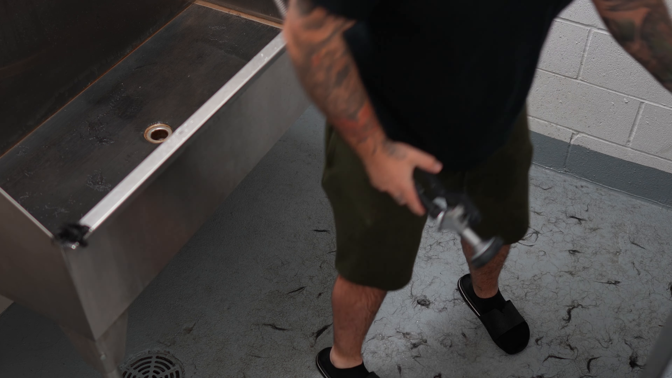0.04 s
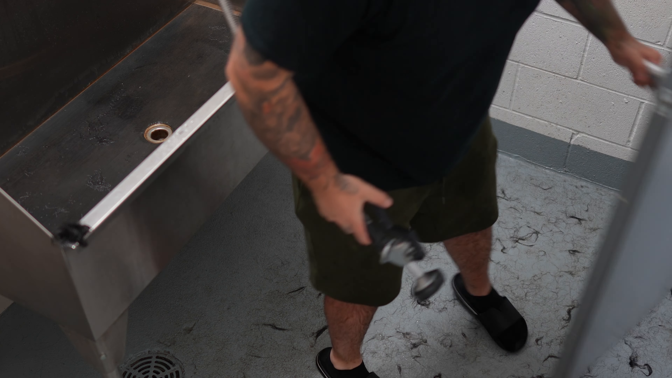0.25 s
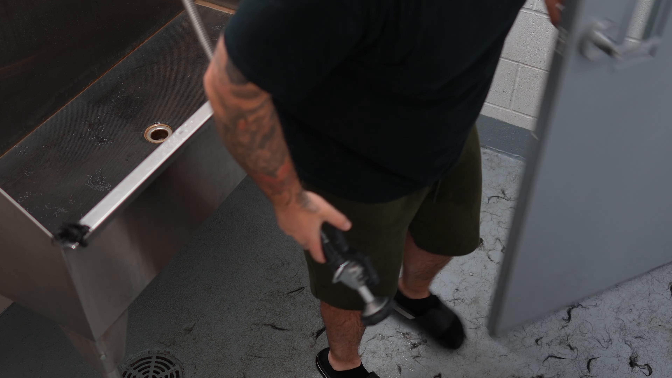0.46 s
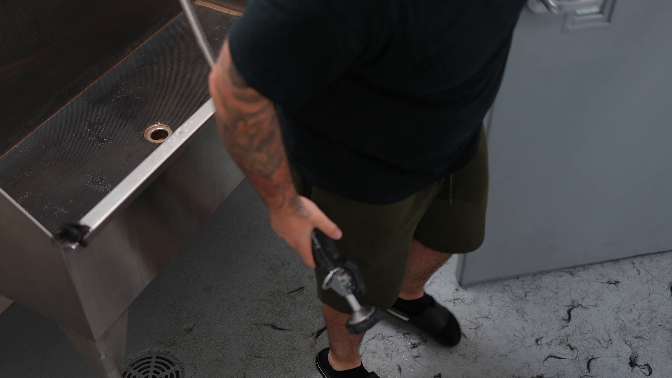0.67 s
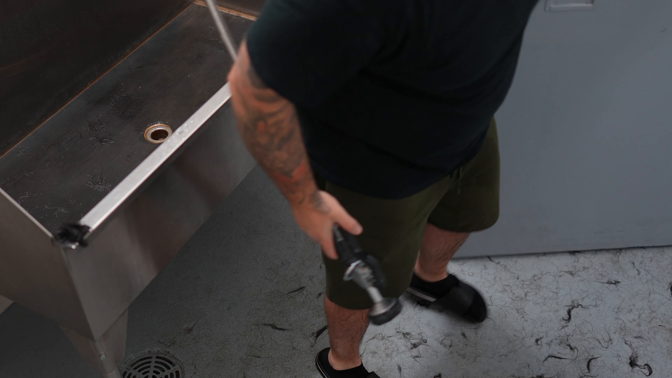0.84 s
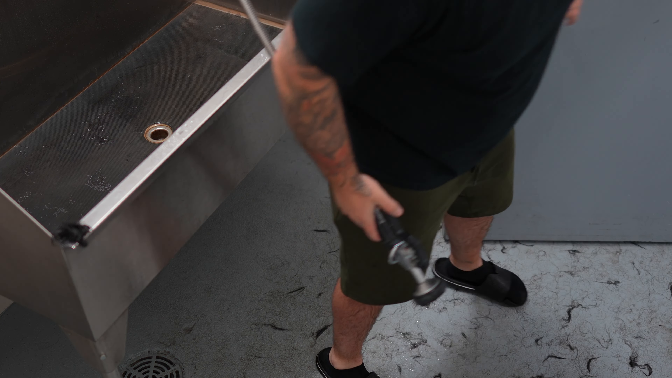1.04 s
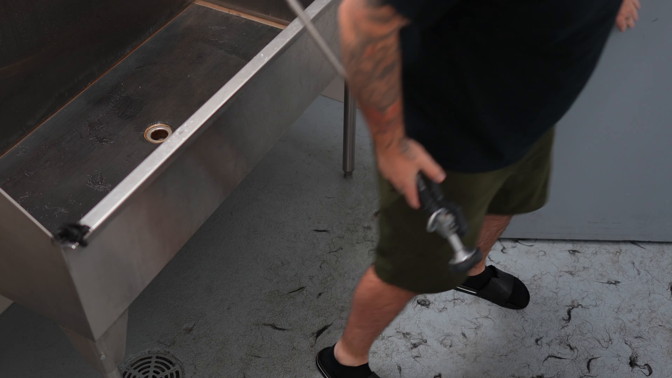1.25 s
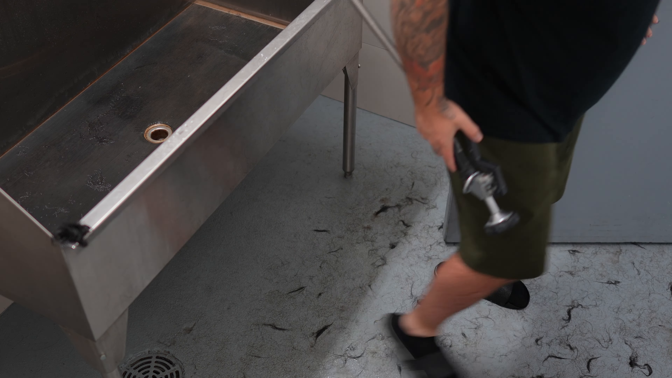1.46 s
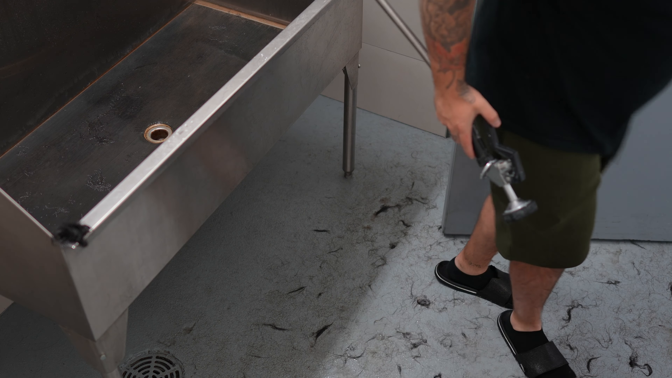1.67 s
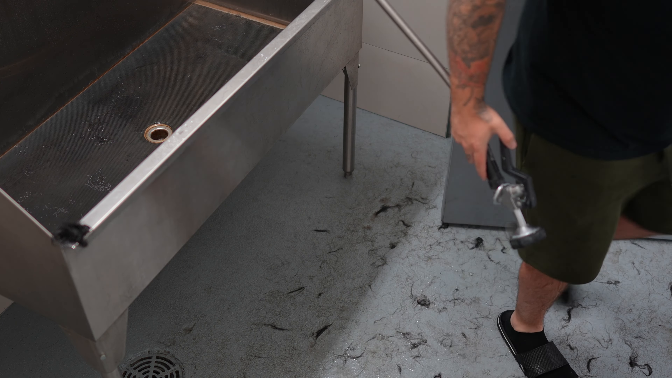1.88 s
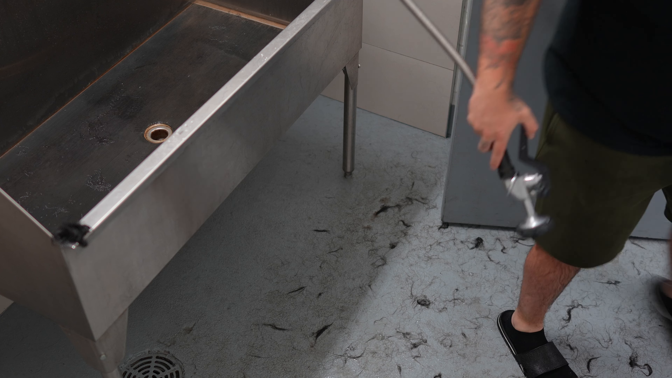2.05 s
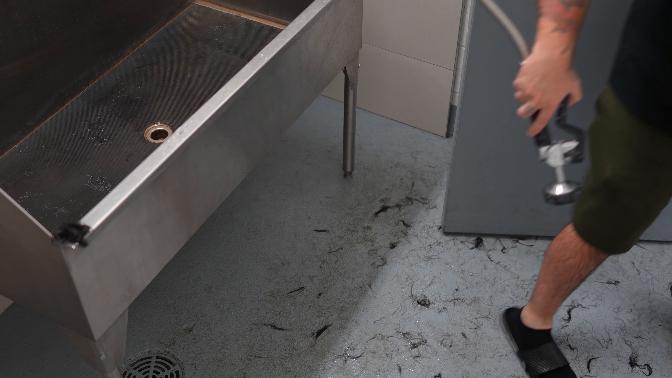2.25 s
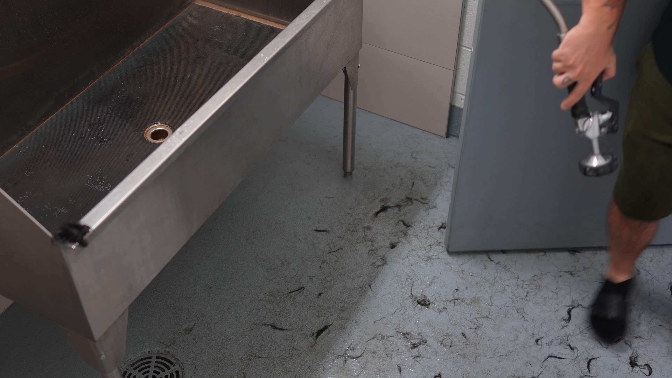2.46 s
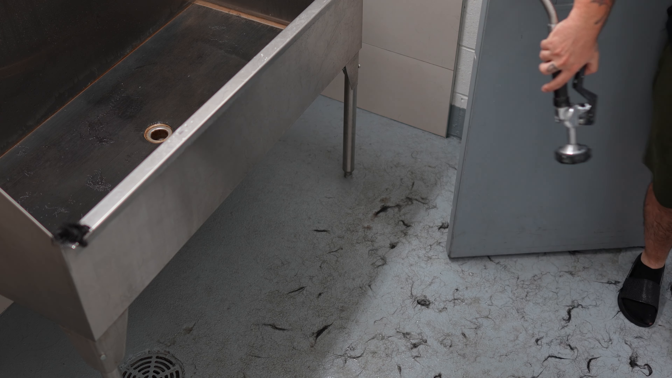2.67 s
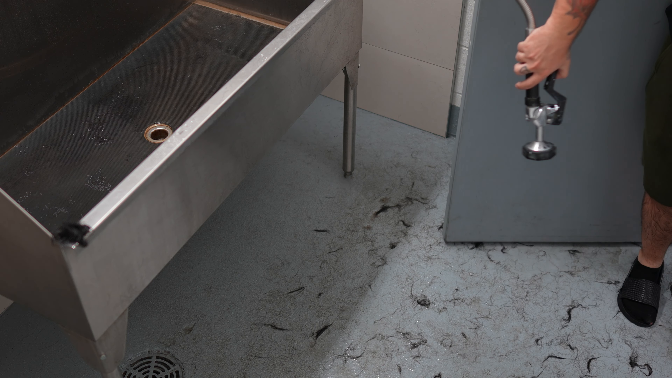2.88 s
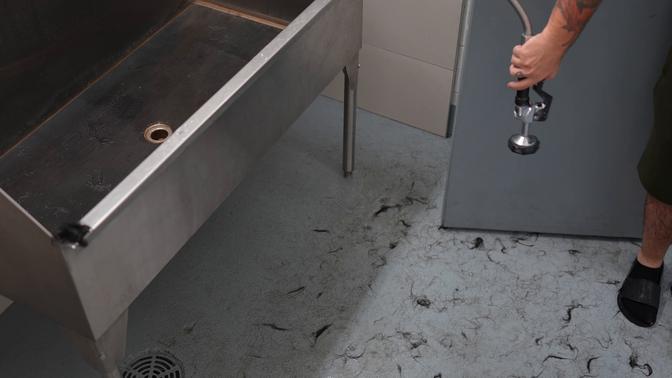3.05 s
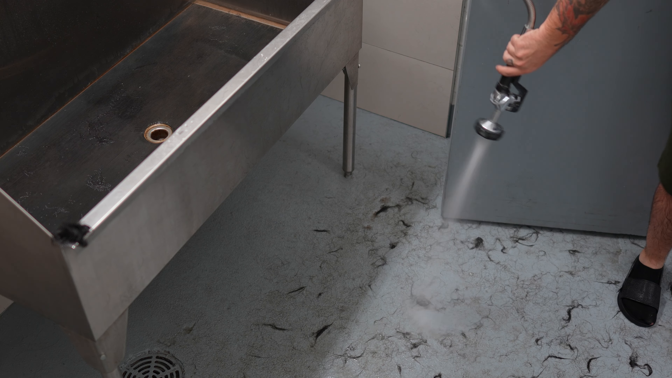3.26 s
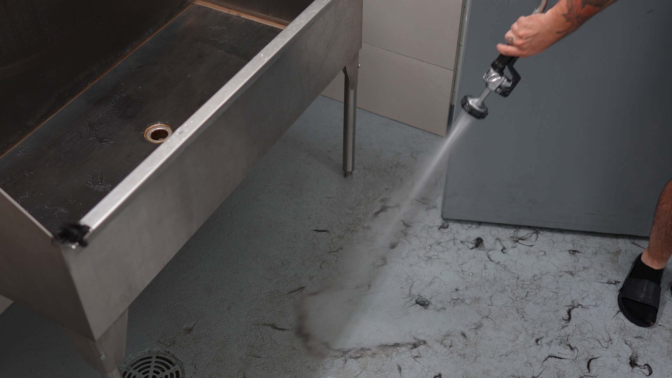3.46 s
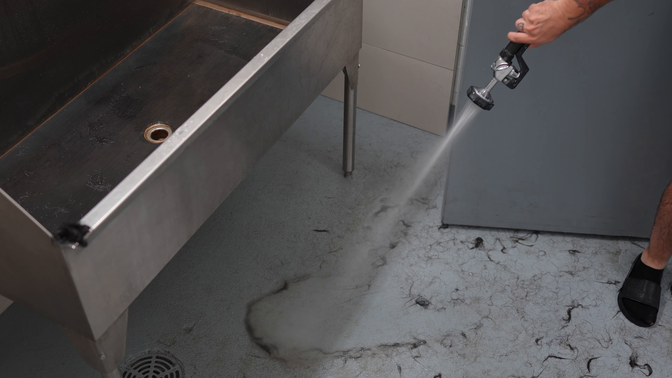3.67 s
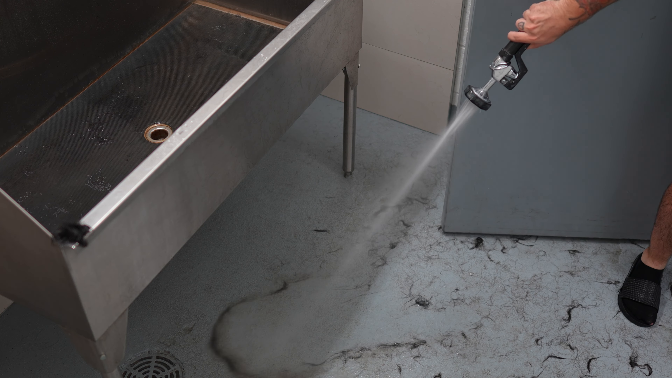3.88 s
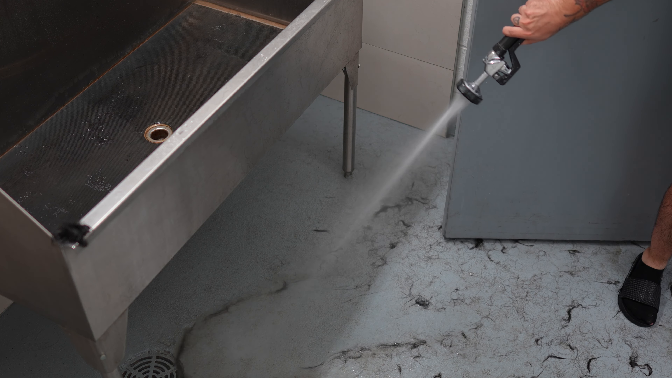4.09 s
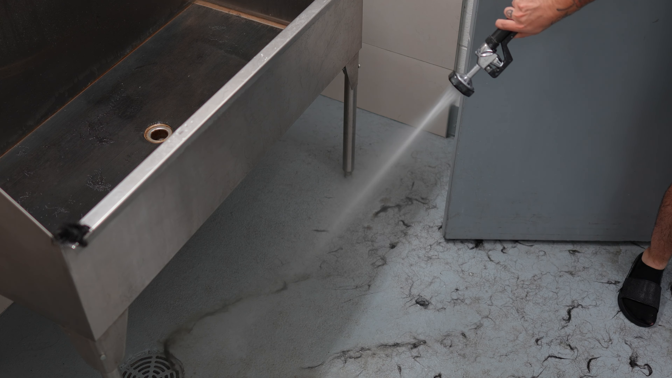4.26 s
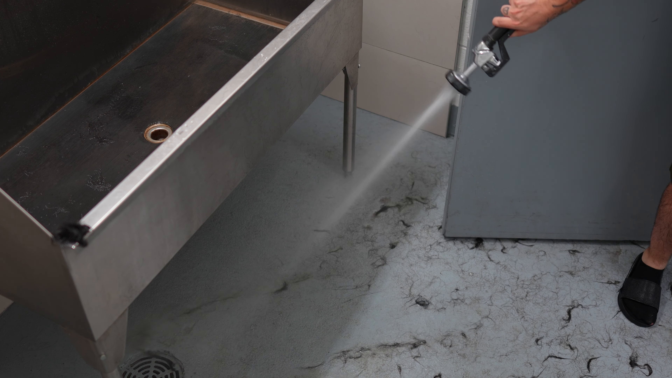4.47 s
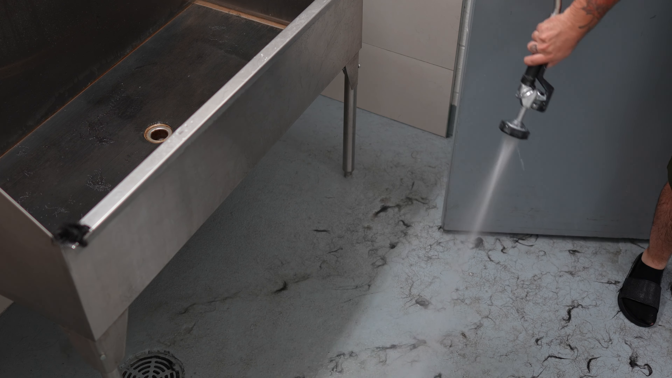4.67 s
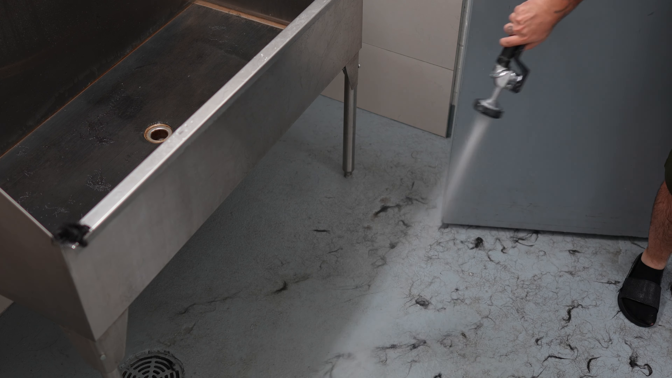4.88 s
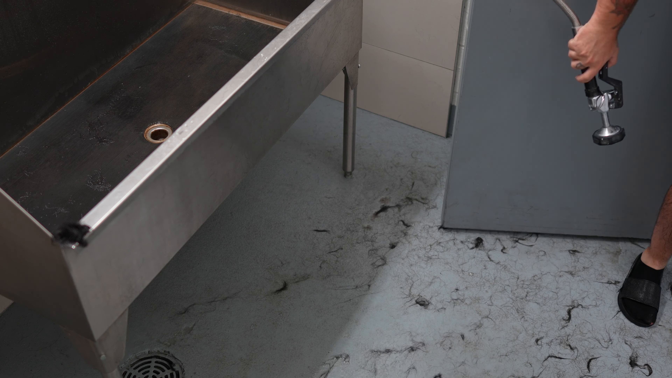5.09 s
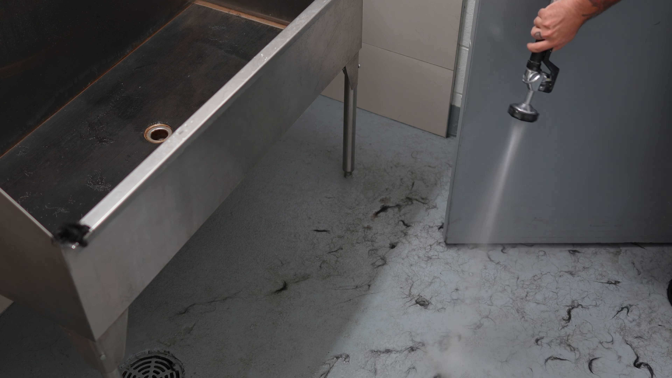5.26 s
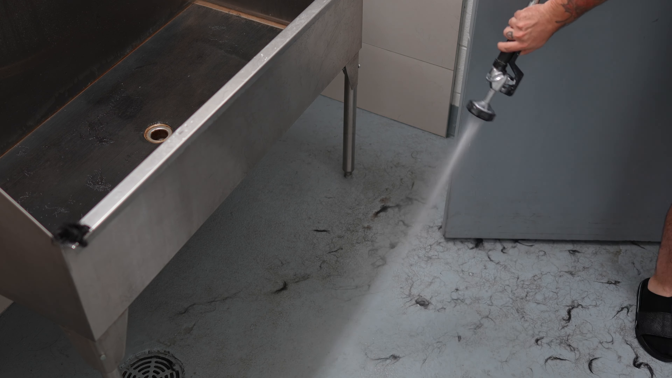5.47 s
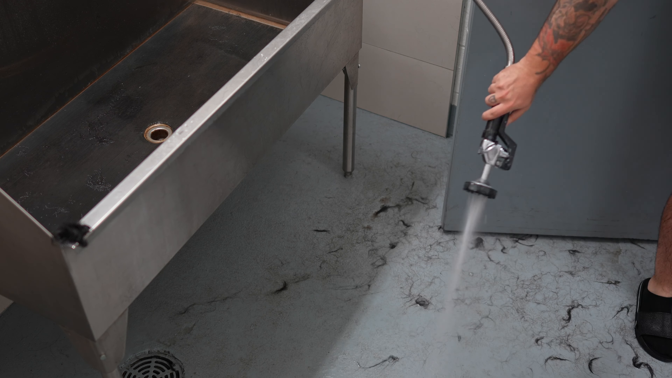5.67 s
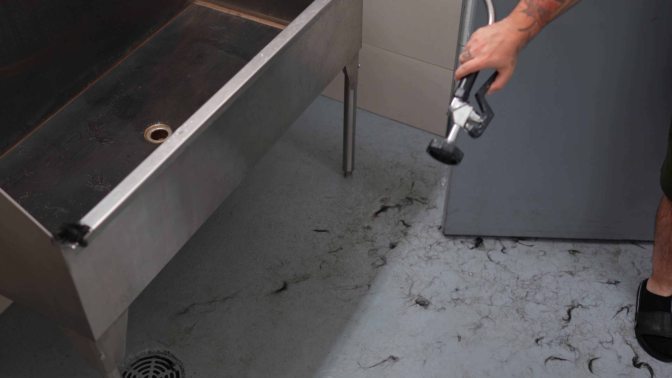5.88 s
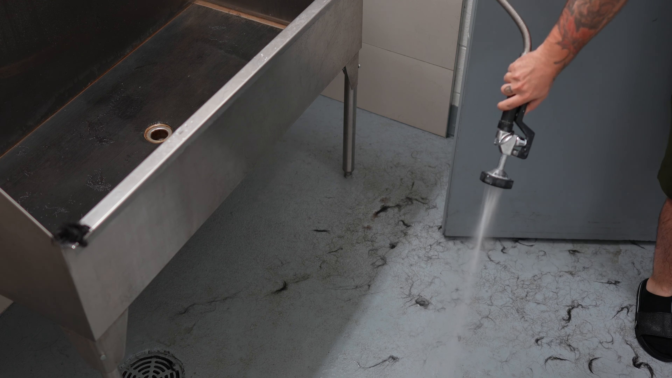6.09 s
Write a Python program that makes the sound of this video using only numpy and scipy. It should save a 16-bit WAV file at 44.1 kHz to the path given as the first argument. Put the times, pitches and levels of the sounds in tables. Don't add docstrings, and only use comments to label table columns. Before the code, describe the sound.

Shuffling soles crackle and squeak in a humming tiled room before a sputtering water jet hisses hard, shuts off, restarts and clunks closed.

```python
import sys
import numpy as np
from scipy import signal
from scipy.fft import rfft, irfft, next_fast_len
from scipy.io import wavfile
from scipy.ndimage import uniform_filter1d, map_coordinates

SR = 44100
rng = np.random.default_rng(int(sys.argv[2]) if len(sys.argv) > 2 else 0)


def dump_mix(stems):
    frames = np.atleast_2d(stems).T
    limited = np.clip(frames, -1, 1)
    pcm = np.round(limited * 32767).astype(np.int16)
    wavfile.write(sys.argv[1], SR, pcm)


def volts_from_db(level):
    exponent = np.asarray(level, float) / 20
    return 10 ** exponent


N = 270333
CUT_S, FAST = 4.668, 2.5

# [start_s, peak_db, ring_hz, thud_db]
TICKS = [(0.0136, -43, 2600, 4), (0.045, -41, 5810, 12), (0.1044, -36, 5300, -7), (0.306, -38, 2630, 15),
         (0.473, -38, 2950, 12), (0.581, -49, 2770, -14), (1.1583, -39, 6560, -13), (1.19, -36, 2740, -8),
         (1.2, -38, 5460, -3), (1.2945, -25.5, 5850, -9), (1.3014, -39, 2990, -15),
         (1.308, -33.5, 9200, -13), (1.3348, -27, 3780, -15), (1.3592, -38, 8400, -17),
         (1.4053, -42, 3980, -9), (1.685, -43, 2730, -11), (1.7203, -31, 6800, -11),
         (1.7587, -28.5, 2790, -14), (1.7994, -43, 5250, -14), (1.8114, -38, 2490, -17),
         (1.8173, -27.5, 6100, -14.5), (2.1899, -33, 1900, 9.5), (2.2024, -37, 7020, -4),
         (2.223, -32.5, 4740, -4), (2.281, -27.5, 9500, -11.5), (2.304, -29.5, 9000, -12),
         (2.6202, -43, 3498, -7), (3.0693, -43, 2752, 2)]
# [start_s, peak_db, ring_hz, snap_db]
SPITS = [(3.2229, -25, 7560, -5), (3.2356, -25.5, 8730, -9), (3.243, -14.5, 6286, -4),
         (3.25, -16.5, 6510, -13), (3.259, -20.5, 6100, -11), (3.2664, -17, 6890, -9),
         (3.2767, -10, 6570, -8), (3.2834, -9, 6400, -12), (3.2984, -8.5, 7800, -12),
         (3.4184, -5, 8300, -8), (3.424, -12, 8110, -13), (3.4694, -13, 7700, -9),
         (3.5194, -10.5, 8050, -9), (5.0355, -20.5, 6470, -2), (5.0777, -35, 11000, -9),
         (5.209, -33, 8900, -1)]
# [open_s, shut_s, rise_s, fall_db_per_s]
BURSTS = [
    (3.212, 4.965, .035, 260),
    (5.205, 5.833, 0.016, 650),
    (6.071, 6.3, 0.0068, 600),
]


def unit(x):
    return x / np.sqrt(np.mean(x ** 2) + 1e-20)


def along(points, hz):
    f, v = np.transpose(points)
    return np.interp(np.log(hz + 1), np.log(f + 1), v)


def wobble(rate, size=N):
    knots = rng.standard_normal(int(size * rate / SR) + 4)
    return map_coordinates(knots, [np.arange(size) * rate / SR])


def filtered(x, response):
    size = next_fast_len(x.shape[-1] + SR // 2)
    spectrum = rfft(x, size) * response(np.fft.rfftfreq(size, 1 / SR))
    return irfft(spectrum, size)[..., :x.shape[-1]]


def modes(rows):
    def response(f):
        return sum((-1) ** k * volts_from_db(db) * 1j * f * width / (c * c - f * f + 1j * f * width)
                   for k, (c, width, db) in enumerate(rows))
    return response


def narrow(hz, width_hz):
    size = len(hz)
    phase = 2 * np.pi * np.cumsum(hz) / SR
    return unit(wobble(width_hz, size) * np.cos(phase) + wobble(width_hz, size) * np.sin(phase))


def patter(spectrum, per_s, share, spread_db, patchy_db, size=N):
    z = signal.stft(rng.standard_normal(size), nperseg=512)[2]
    patches = uniform_filter1d(uniform_filter1d(rng.standard_normal(z.shape), 8, 0), 10, 1)
    noise = signal.istft(z * volts_from_db(patchy_db * unit(patches)), nperseg=512)[1][:size]
    draw = rng.random((3, size))
    strength = volts_from_db(-spread_db * np.log(draw[1] + .01))
    hits = (draw[0] < per_s / SR) * strength * np.sign(draw[2] - .5)
    share = np.clip(share, 0, 1)
    mix = np.sqrt(1 - share) * unit(noise) + np.sqrt(share) * unit(hits)
    return unit(filtered(mix, lambda hz: volts_from_db(along(spectrum, hz))))


def cracks(rows, life_s, ring_db, width):
    out, t = np.zeros(N + SR), np.arange(SR // 20) / SR
    for s, db, hz, snap_db in rows:
        bright = np.convolve(rng.standard_normal(len(t)), [.7, .7, -.2, -.7, -.5])[:len(t)]
        snap = volts_from_db(snap_db - 60 * t / life_s) * bright
        ring = volts_from_db(ring_db - 40 * t / life_s) * narrow(hz + 0 * t, width * hz)
        onset = 1 - np.exp(-t / 0.00032)
        out[round(s * SR):][:len(t)] += volts_from_db(db) * (.4 * snap + ring) * onset
    return out[:N]


def kicks(times, life_s):
    t = np.arange(N) / SR
    lag = t - np.concatenate([[-9], times])[np.searchsorted(times, t)]
    return np.exp(-lag / life_s)


def tone(rows, size):
    s, hz, db = np.transpose(rows)
    t = np.arange(size) / SR
    pitch = np.interp(np.minimum(t, CUT_S - .3), s, hz) + 1.2 * wobble(5, size)
    return np.sin(2 * np.pi * np.cumsum(pitch) / SR), np.sqrt(2) * volts_from_db(np.interp(t[:N], s, db))


def ventilation():
    # [pitch_hz, level_db_per_hz]
    duct = [(35, -90), (60, -60), (91, -32), (107, -18), (171, -8), (255, 2), (322, -5), (416, -9.5),
            (456, -8.5), (604, -9.5), (690, -12.5), (1220, -18.5), (2690, -24), (5500, -35), (9500, -48.5),
            (15800, -56.5)]
    # [pitch_hz, level_db]
    hum = [(295, -50), (425, -62), (523, -61.5), (602, -78)]
    # [start_s, pitch_hz, level_db]
    door_hum = [(0.0, 474.6, -38.5), (0.13, 475, -44.5), (0.75, 476.8, -44.5), (0.84, 483, -67),
                (1.24, 479.2, -52), (1.34, 476.9, -50), (2.34, 478, -48.5), (3.4, 486, -50.5),
                (4.35, 479.3, -45.5), (4.9, 478.3, -50), (5.42, 480, -44.5), (5.77, 480, -52),
                (6.13, 482, -48.5)]
    # [pitch_hz, level_db]
    mains = (120, -55.5)
    # [start_s, pitch_hz, level_db]
    blade = [
        (0, 626, -60),
        (2.0, 621, -59.5),
        (2.15, 624, -59),
        (2.6, 625, -53.5),
        (3.1, 626, -55),
        (3.4, 622, -80),
    ]
    size = 3 * N // 2
    t = np.arange(size) / SR
    lines = volts_from_db(mains[1] + 2.5) * np.sin(2 * np.pi * mains[0] * t)
    for hz, db in hum:
        lines += volts_from_db(db + 2.5 + 0.84 * wobble(3.02, size)) * np.sin(2 * np.pi * hz * t)
    air = patter(duct, 300, 0, 1, patchy_db=0.98, size=size)

    now, piece = np.arange(N), 1300
    since = np.maximum(now - CUT_S * SR, 0)

    def skip(shift):
        jump = (FAST - 1) * piece * np.floor(since / piece + shift)
        return np.minimum(now + jump.astype(int) * (since > 0), size - 1)

    fade = np.sin(np.pi / 2 * np.clip(since / piece % 1 / .4 + (since == 0), 0, 1)) ** 2

    def kept(x):
        return np.sqrt(fade) * x[skip(1)] + np.sqrt(1 - fade) * x[skip(0)]

    tones = sum(gain * kept(wave) for wave, gain in (tone(door_hum, size), tone(blade, size)))
    door_db = 6 * np.exp(-now / SR / 0.048)
    return volts_from_db(-42.5 + door_db + 1.5) * kept(air) + kept(lines) + tones


def sole_pressure():
    # [start_s, scrape_db, hold_s, grit_over_scrape_db, body_over_scrape_db]
    strokes = [(0.009, -46.5, 0.025, -4, 0), (.13, -54.5, 0.11, -4, -14), (0.314, -52, 0.026, -9.5, 4.5),
               (.472, -57, .03, -11, 3), (0.574, -51.5, .01, -18, -14), (1.152, -50.5, 0.046, -7.5, 1),
               (1.285, -42.5, .012, -16, -4), (1.334, -45, 0.028, -6.5, -4), (1.673, -45.5, .04, -8, -2.5),
               (1.715, -42, .06, -8.5, -4.5), (1.814, -44.5, 0.029, -7, 2.5),
               (2.195, -42.5, 0.069, -7.5, 0), (2.273, -46, .055, -7.5, -11), (2.505, -57, 0.12, -10, 0),
               (2.625, -47, .03, -10.5, -3)]
    lift = [91.5, 122, 60]
    attack_s = 0.0049
    t, power = np.arange(N) / SR, np.zeros((3, N))
    for s, db, hold_s, grit_db, body_db in strokes:
        fade_db = np.outer(lift, np.maximum(t - s - hold_s, 0))
        level_db = db + np.array([[0], [grit_db], [body_db]]) - fade_db
        power += (np.clip((t - s) / attack_s, 0, 1) * volts_from_db(level_db)) ** 2
    return np.sqrt(power)


def sole_drags():
    # [pitch_hz, level_db_per_hz]
    rubber = [(1200, -5.5), (2500, -1.5), (4000, -2), (7000, -5.5), (11000, -27.5)]
    # [pitch_hz, level_db_per_hz]
    grains = [(4000, -45), (7500, 1.5), (10000, 0), (13000, -7), (16000, -36)]
    # [pitch_hz, level_db_per_hz]
    body_tone = [(350, -30), (800, -3), (1400, 0.5), (2200, -4.5), (4000, -25)]
    scrape, grit, body = sole_pressure()
    drag = scrape * patter(rubber, 2500, 0.77, 2.9, 1.5)
    drag += grit * patter(grains, 2000, 0.27, 2.3, 1.6)
    drag += volts_from_db(-1.0) * body * patter(body_tone, 1200, 0.42, 2.5, 0.78)
    jolt = 1 + .9 * kicks([row[0] for row in TICKS], .012)
    return volts_from_db(-5.5) * drag * volts_from_db(2.5 * wobble(60)) * jolt


def slaps():
    # [start_s, peak_db, ring_hz, snap_db]
    flicks = [
        (.5822, -40, 6000, 6),
        (2.1895, -30, 3000, -16),
    ]
    ticks = [(s, db, hz, 0.5 - 0.28 * max(thud_db + 8, 0)) for s, db, hz, thud_db in TICKS]
    snaps = cracks(ticks + list(flicks), 0.011, ring_db=-5.5, width=0.36)
    thuds = np.zeros(N)
    for s, db, _, thud_db in TICKS:
        thuds[round(s * SR)] = volts_from_db(db + thud_db + 19)
    body = modes([(900, 900, 0), (1600, 700, -3)])
    return snaps + filtered(thuds, lambda hz: body(hz) / (1 + 1j * hz / 2200) ** 2)


def squeals():
    # [start_s, end_s, from_hz, to_hz, level_db]
    glides = [(.3, 0.343, 2700, 2640, -58.5), (0.459, 0.539, 5100, 5050, -71),
              (.95, 1.0, 10300, 11350, -86), (0.998, 1.12, 11400, 11200, -84),
              (1.295, 1.343, 3200, 2950, -49), (1.322, 1.34, 4030, 3800, -53),
              (1.338, 1.362, 10300, 10200, -56), (1.345, 1.401, 8500, 8300, -56),
              (1.82, 1.86, 6800, 6400, -66), (2.93, 3.12, 9800, 9900, -85.5)]
    out = np.zeros(N)
    for start, end, from_hz, to_hz, db in glides:
        u = np.linspace(0, 1, round((end - start) * SR))
        squeal = narrow(from_hz + (to_hz - from_hz) * u, 220)
        out[round(start * SR):][:len(u)] += volts_from_db(db + 4) * np.sin(np.pi * u) ** .5 * squeal
    return out


def rustles():
    # [start_s, end_s, pitch_hz, level_db]
    brushes = [
        (.3, .41, 15000, -78),
        (2.47, 2.61, 14800, -74),
        (3.1, 3.21, 14500, -84),
    ]
    out = np.zeros(N)
    for start, end, hz, db in brushes:
        size = round((end - start) * SR)
        out[round(start * SR):][:size] += volts_from_db(db) * np.hanning(size) * narrow(np.full(size, hz), 1800)
    return out


def flow():
    # [start_s, jet_db, aim_db]
    pressure = [(3.3, -23.5, 0.27), (3.374, -26.5, 0), (3.43, -24.5, 1), (3.5, -26.5, -0.5),
                (3.535, -25, 0.79), (3.66, -29.5, 0.72), (3.92, -33.5, 0.56), (4.22, -34.5, 0),
                (4.65, -36, 0.98), (4.71, -34.5, -0.39), (4.766, -35.5, -0.68), (4.832, -31.5, 1.1),
                (4.902, -36, 0.094), (5.22, -34.5, 0), (5.338, -32, -1.6), (5.55, -35, -0.049),
                (5.6, -33.5, 0.69), (5.82, -38.5, -0.41)]
    # [start_s, level_db, life_s, splash_over_db, mist_over_db]
    slugs = [
        (5.031, -50, .009, -3, -3),
        (5.074, -62, .005, -9, 10),
        (5.158, -51, 0.015, 1, -19),
        (5.809, -45, 0.012, -4, -10),
        (5.834, -52, .012, 14, -8),
        (5.965, -77, 0.024, 0, 5),
        (6.04, -61, 0.021, 4, 2),
    ]
    t = np.arange(N) / SR
    s, jet_db, aim_db = np.transpose(pressure)
    over_db = np.interp(t, s, jet_db) + 32
    aim_db = np.interp(t, s, aim_db)
    late = t - 0.034 / np.where(t > CUT_S, FAST, 1)

    def opened(lands, on, rise_s):
        leak_db_per_s = 330 * (FAST if on > CUT_S else 1)
        leak = volts_from_db(-22 - leak_db_per_s * np.abs(lands - on))
        return 1 - np.exp(-np.maximum(lands - on, 0) / rise_s) + leak

    def trigger(lands):
        return sum(opened(lands, on, rise_s) * volts_from_db(-fall * np.maximum(lands - off, 0))
                   for on, off, rise_s, fall in BURSTS)

    nozzle = volts_from_db(over_db - 32) * trigger(t)
    splash = volts_from_db(-40 + 0.24 * over_db + aim_db) * trigger(late)
    mist = volts_from_db(-35 + 1.04 * over_db - aim_db) * trigger(t)
    out = np.array([nozzle, splash, mist, 0 * t])
    for s, db, life_s, splash_db, mist_db in slugs:
        u = np.maximum(t - s, 0) / life_s
        levels = np.array([[0], [splash_db], [mist_db], [3.5]])
        out += volts_from_db(db + levels) * (u * np.exp(1 - u)) ** 2
    whole = np.ones(N)
    for on, _, rise_s, _ in BURSTS:
        broken = (late < on + rise_s) * (t > on - rise_s)
        whole -= broken * np.exp(-np.maximum(late - on, 0) / rise_s * 2)
    return (*out, whole)


def thin(hz):
    return 1 / (1 + (3470 / (hz + 1)) ** 4)


def sputtering():
    from_pull_s = np.abs(np.arange(N) / SR - BURSTS[0][0])
    starved = 0.75 * np.clip(1 - from_pull_s / 0.078, 0, 1) ** .5
    return 1 - starved + 2 * starved * kicks([row[0] for row in SPITS], .003)


def air_pocket():
    # [start_s, pitch_hz, level_db]
    whistle = [
        (3.235, 6300, -42),
        (3.29, 6400, -30.5),
        (3.35, 6300, -35),
        (3.408, 7730, -35),
        (3.418, 8122, -28),
        (3.469, 8240, -34.5),
        (3.531, 8300, -36.5),
        (3.599, 7500, -48),
        (3.85, 7780, -44),
    ]
    t = np.arange(N) / SR
    s, hz, db = np.transpose(whistle)
    return volts_from_db(np.interp(t, s, db, -200, -200)) * narrow(np.interp(t, s, hz), 700)


def spray():
    # [pitch_hz, level_db_per_hz]
    hiss_tone = [(1500, -14.5), (3500, -8), (5000, -3.5), (6500, -2.5), (8200, -2), (10500, -5),
                 (13000, -20.5), (16000, -33.5)]
    # [pitch_hz, level_db_per_hz]
    floor_tone = [(250, -42), (600, -1.5), (1200, -4), (2500, -2), (4000, -3), (7000, -14), (12000, -38)]
    # [pitch_hz, level_db_per_hz]
    mist_tone = [(5000, -48), (9000, -6.5), (11000, 0), (14500, -3.5), (15900, -5)]
    nozzle, splash, mist, gulp, whole = flow()
    flutter = volts_from_db(0.34 * wobble(14) + 0.33 * wobble(120))
    sputter = sputtering()
    hiss = patter(hiss_tone, 4000, 0.37, 1.1, 1.2)
    hiss = whole * hiss + (1 - whole) * filtered(hiss, thin)
    jet = sputter * (nozzle * hiss + air_pocket())
    jet += gulp * narrow(np.full(N, 6400), 2400)
    drops = splash * patter(floor_tone, 3000, 0.29, 1.5, 0.9)
    drops += sputter * mist * patter(mist_tone, 4000, 0.28, 3.1, 1.9)
    spits = filtered(cracks(SPITS, 0.0073, ring_db=-7, width=.15), thin)
    return flutter * (jet + drops) + volts_from_db(1.5) * spits


def valve_slams():
    # [pitch_hz, width_hz, level_db]
    body = [(178, 46, 3), (750, 25, 10), (1290, 140, -2.5)]
    # [start_s, level_db]
    seat = [
        (5.837, 8),
        (5.851, 8),
    ]
    blows = np.zeros(N)
    for s, db in seat:
        blows[round(s * SR)] = volts_from_db(db)
    return filtered(blows, lambda hz: modes(body)(hz) / (1 + 1j * hz / 1800) ** 2)


def room(x, speed):
    # [pitch_hz, t60_s]
    decay = [(300, .6), (2000, .6), (5000, .55), (10000, .42), (14000, .28), (16000, .2)]
    hz, t, z = signal.stft(rng.standard_normal(int(.7 * SR)), SR, nperseg=256)
    fading = volts_from_db(-60 * t * speed / along(decay, hz)[:, None])
    tail = signal.istft(z * fading, SR, nperseg=256)[1]
    return signal.fftconvolve(np.pad(x, (200, 0)), tail / np.linalg.norm(tail))[:N]


def scene():
    feet = sole_drags() + slaps() + squeals() + rustles()
    water = spray() + valve_slams()
    late = np.arange(N) > CUT_S * SR
    send = volts_from_db(-3.0) * feet + volts_from_db(-11.5) * water
    near = feet + volts_from_db(1) * water
    near += room(send * ~late, speed=0.83) + volts_from_db(-2.0) * room(send * late, FAST)
    mono = filtered(near, lambda hz: (hz / 130) ** 6 / (1 + (hz / 130) ** 6)) + ventilation()
    return np.array([mono, mono])


def roll_off(x):
    return signal.sosfilt(signal.butter(12, 16490, fs=SR, output="sos"), x)


def record(dry):
    t = np.arange(N) / SR
    hiss = volts_from_db(-84.5) * unit(filtered(rng.standard_normal(N), lambda hz: 1 / (1 + (hz / 120) ** 4)))
    mono = filtered(dry[0] + hiss, lambda hz: np.clip((15950 - hz) / 150, 0, 1))
    mono = mono * np.clip(np.abs(t - CUT_S) / 0.001998, 0, 1)

    count, low_hz, top_hz, width = 18, 4200, 11500, .22
    hz, frames, z = signal.stft(mono, SR, nperseg=1024)
    draw = rng.random((count, 2))
    busy = np.cumsum(np.abs(z[hz > low_hz]).sum(0) ** .5)
    starts = np.interp(draw[:, 0], busy / busy[-1], frames)
    lows = low_hz * (top_hz / low_hz) ** draw[:, 1]
    chosen = np.zeros(z.shape, bool)
    for s, low in zip(starts, lows):
        chosen |= np.outer((hz > low) & (hz < low * (1 + width)), np.abs(frames - s) < .017)
    scrambled = z * chosen * np.exp(2j * np.pi * rng.random(z.shape))
    side = volts_from_db(-5.5) * signal.istft(scrambled, SR, nperseg=1024)[1][:N]
    return roll_off(np.array([mono + side, mono - side]))


dry = scene()
out = record(dry)
dump_mix(out)
```